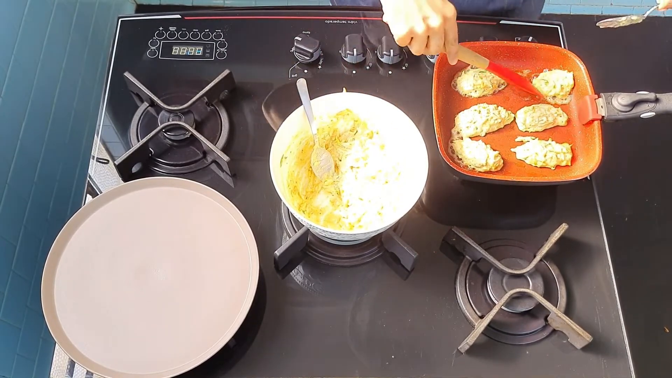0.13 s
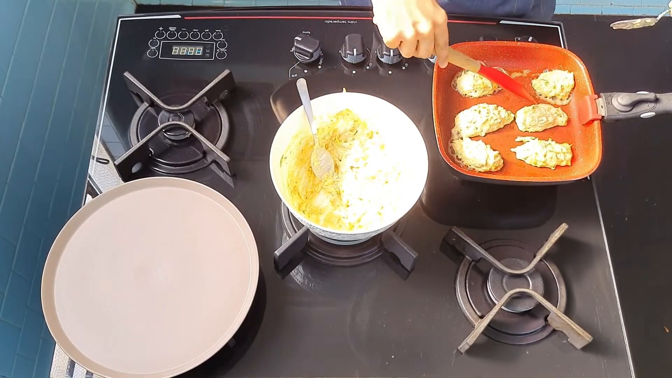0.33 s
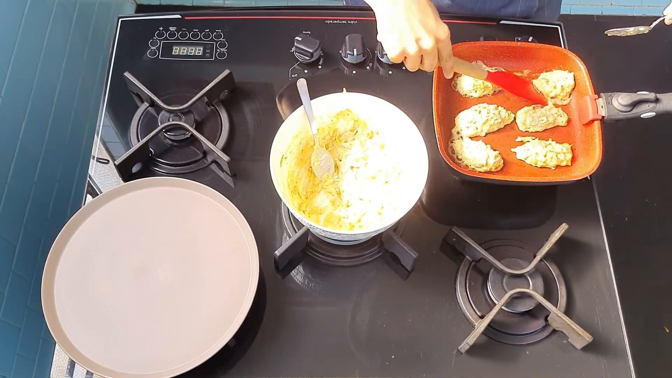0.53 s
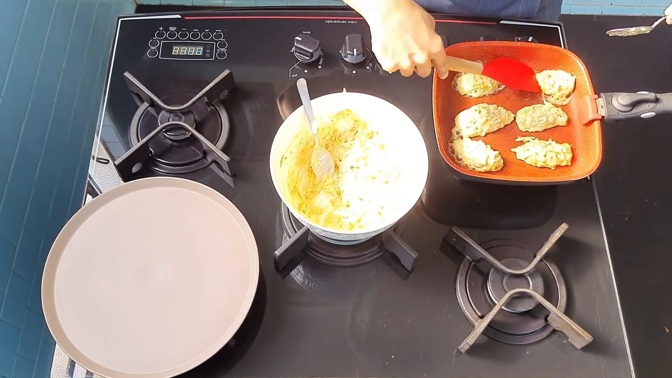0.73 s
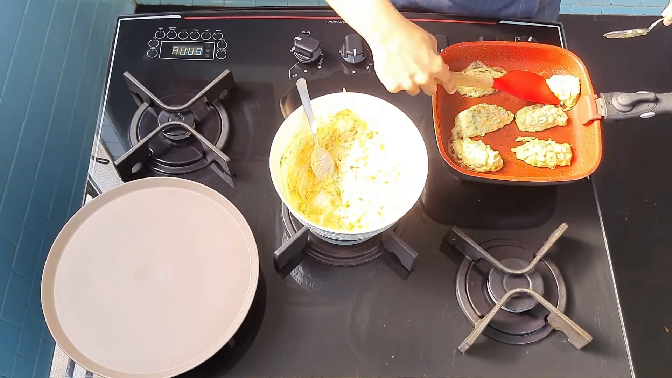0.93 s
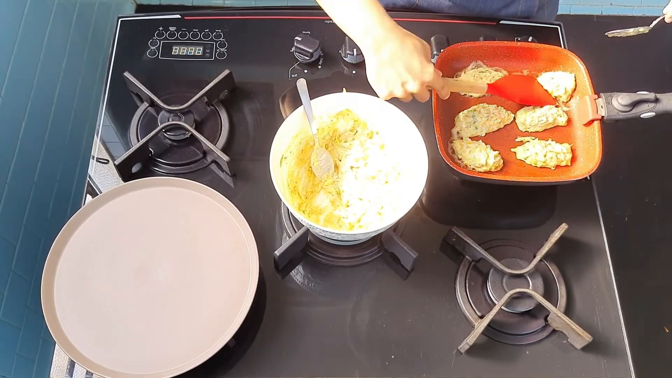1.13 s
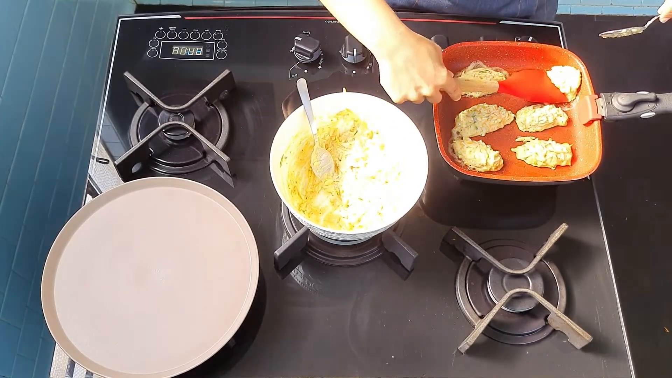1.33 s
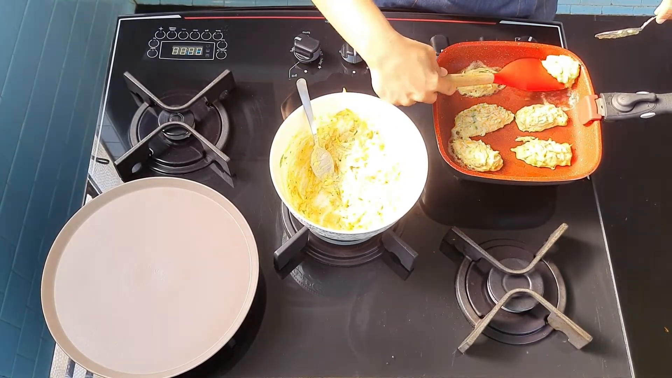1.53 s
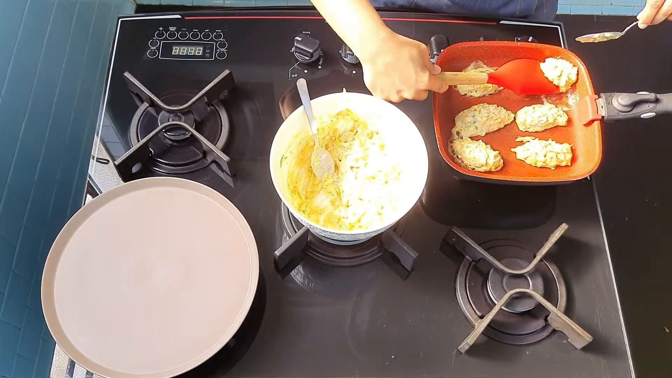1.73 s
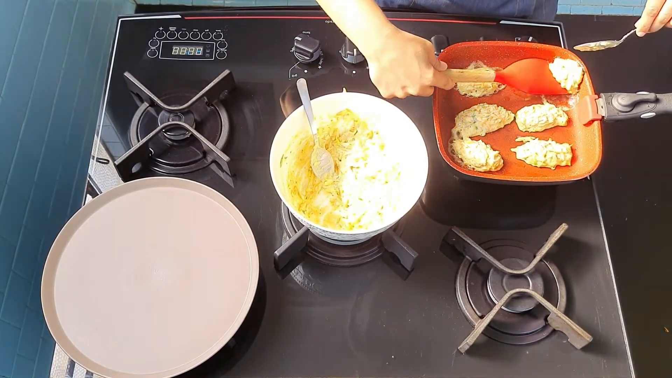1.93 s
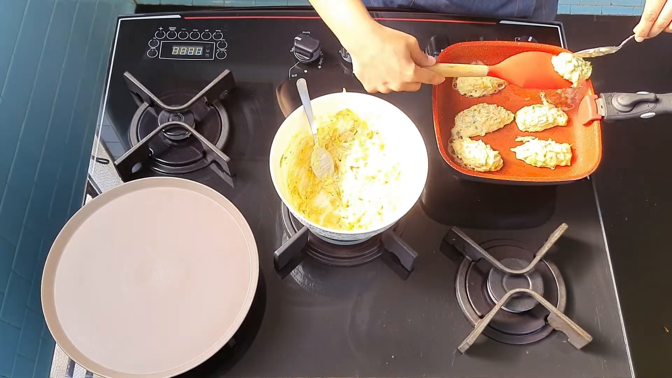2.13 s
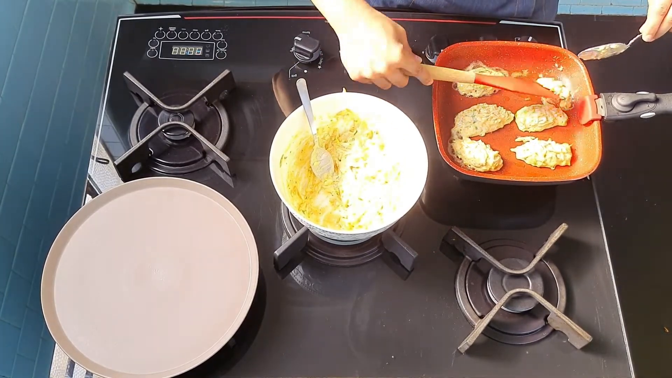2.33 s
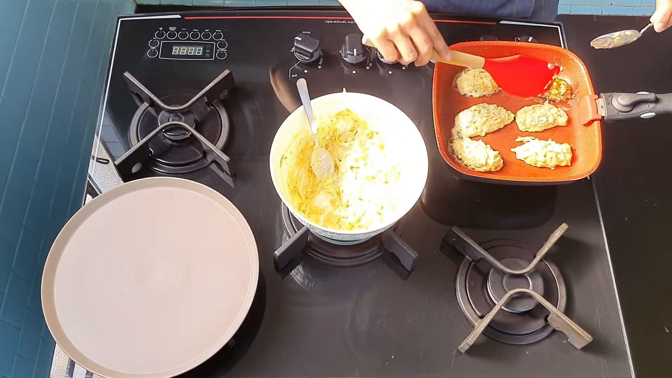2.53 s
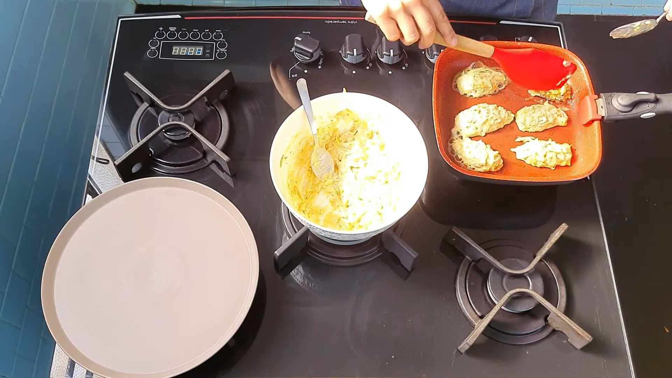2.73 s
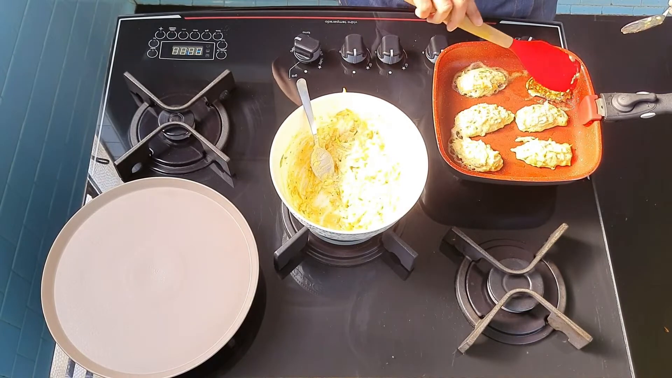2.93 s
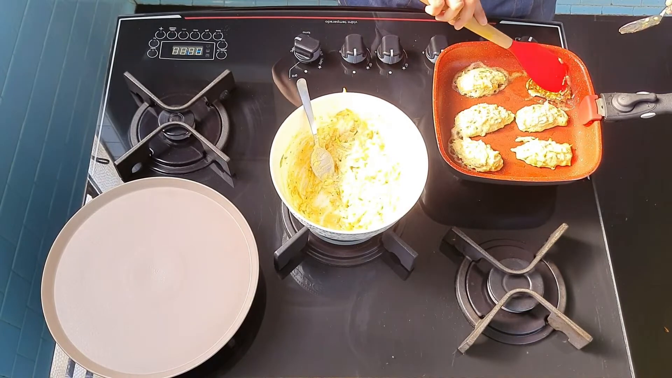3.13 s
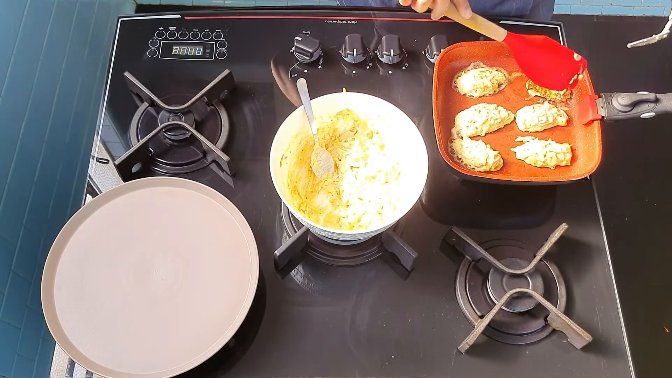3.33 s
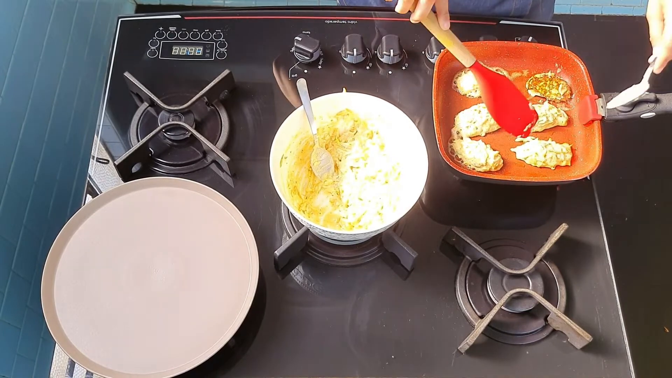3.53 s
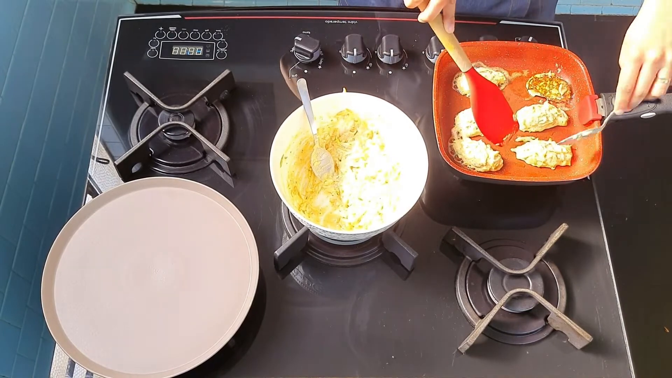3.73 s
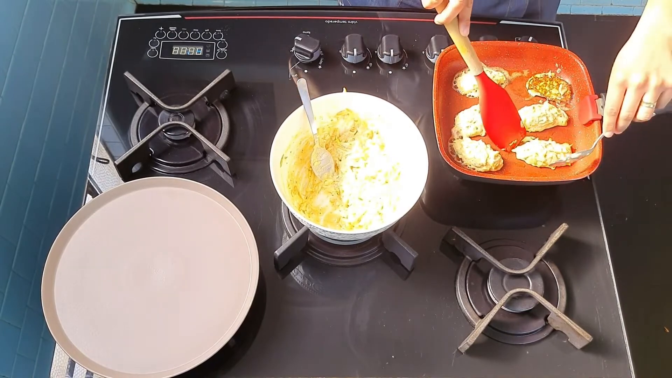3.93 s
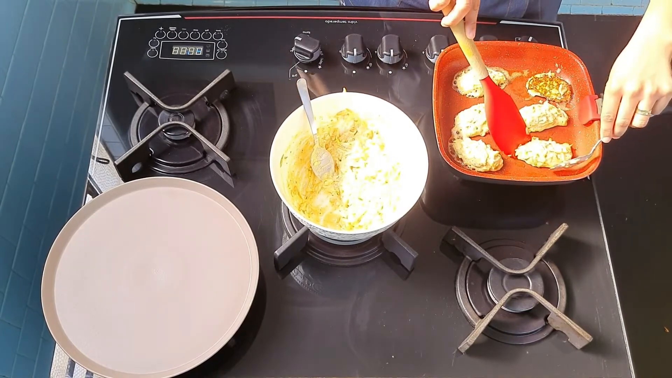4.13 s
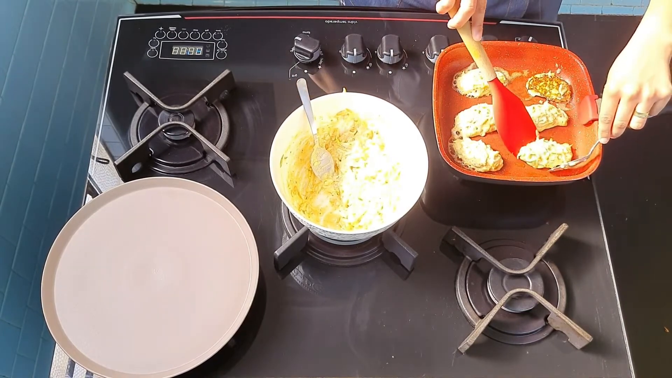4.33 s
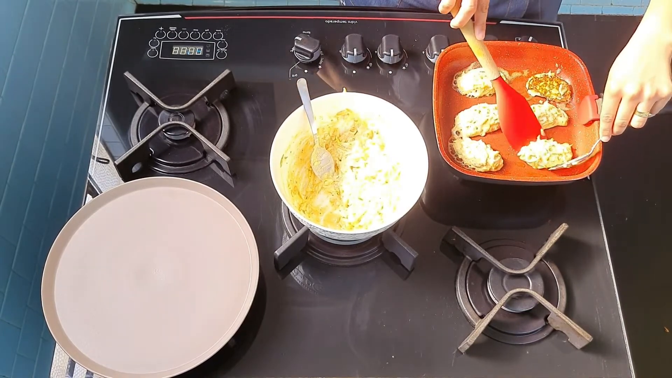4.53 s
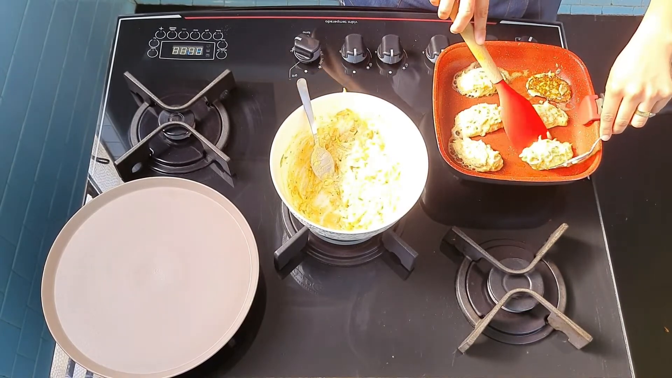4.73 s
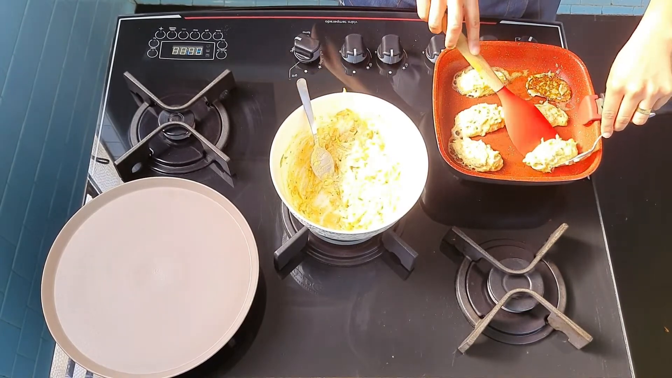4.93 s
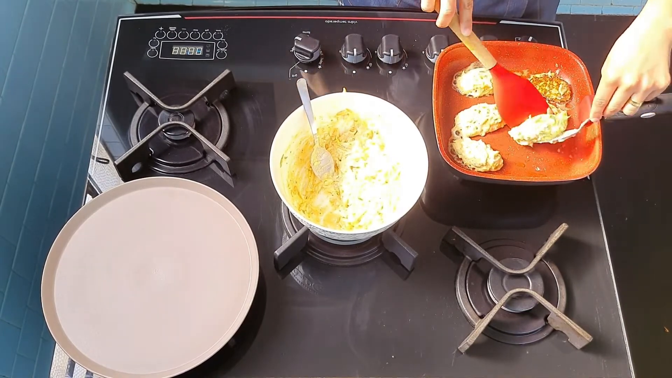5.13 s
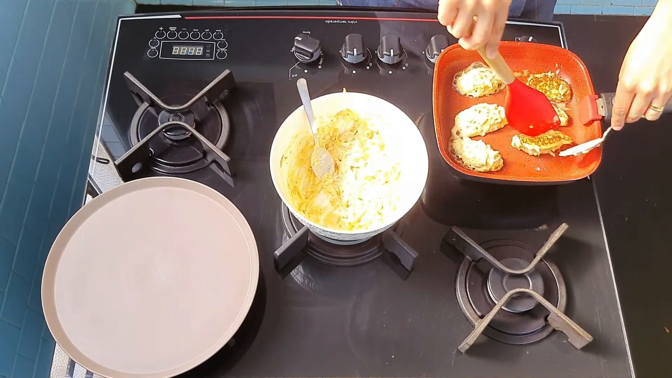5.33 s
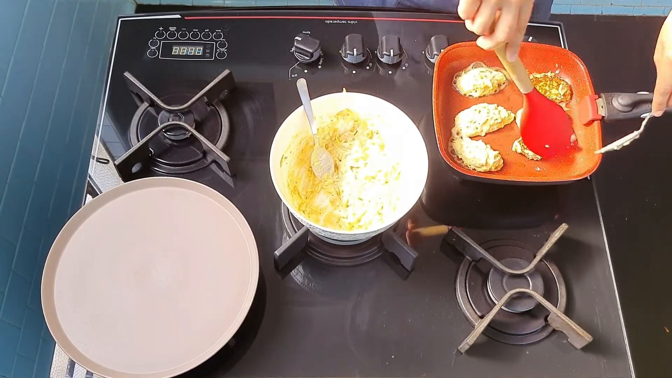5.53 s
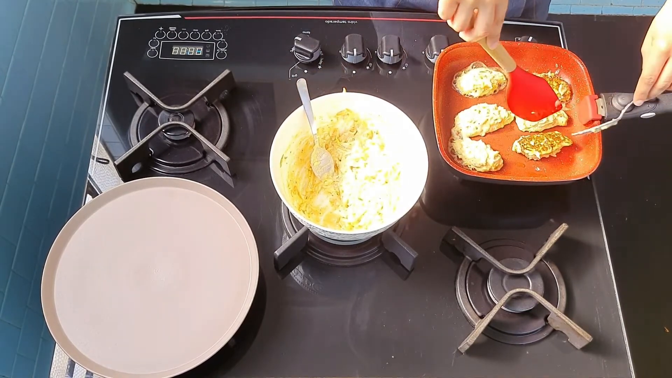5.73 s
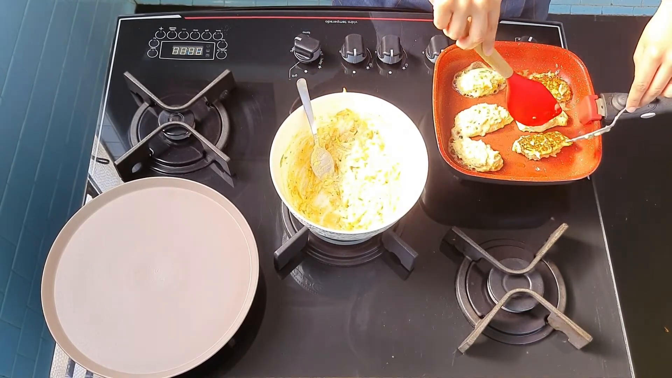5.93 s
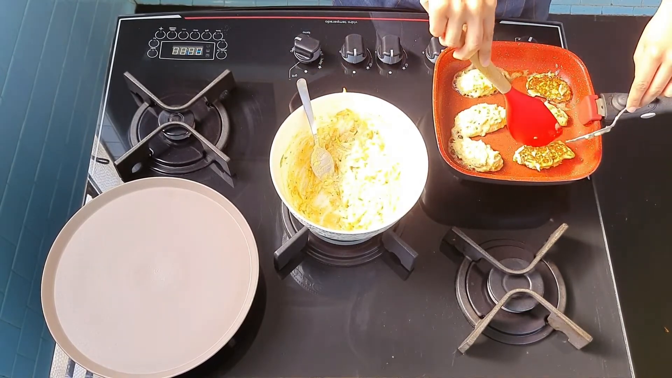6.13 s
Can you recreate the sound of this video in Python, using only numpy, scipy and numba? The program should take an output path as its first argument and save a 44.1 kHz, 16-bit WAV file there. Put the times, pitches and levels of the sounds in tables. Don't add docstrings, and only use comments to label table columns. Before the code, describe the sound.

Close, bright frying in a small kitchen: fritters sizzle softly in shallow oil, then flare with crackles and light spatula taps as one is lifted. The sizzle thins, then bursts up sharply when the wet side lands, spitting hard before easing and building again at the next turn. A faint extractor fan hums and hisses steadily behind. The phone microphone is near the pan, thin in bass and crisp on top.

```python
import sys
import numpy as np
from scipy import signal
from scipy.fft import rfft, irfft
from scipy.io import wavfile
from scipy.ndimage import uniform_filter1d
from numba import njit

SR = 44100
rng = np.random.default_rng(int(sys.argv[2]) if len(sys.argv) > 2 else 0)


def int16_out(signal):
    q = np.round(np.clip(np.atleast_2d(signal).T, -1, 1) * 32767)
    wavfile.write(sys.argv[1], SR, q.astype(np.int16))


def decibels_to_gain(level_db):
    exponent = np.asarray(level_db, float) / 20
    return 10 ** exponent


N = 272538


def level(x, db):
    return x * decibels_to_gain(db) / np.sqrt(np.mean(x ** 2))


def highpass(x, hz):
    return signal.sosfilt(signal.butter(2, hz, "high", fs=SR, output="sos"), x)


def colour(x, points):
    hz, db = np.transpose(points)
    f = np.maximum(np.arange(N // 2 + 1) * SR / N, 1)
    gain_db = np.interp(np.log(f), np.log(hz), db)
    return irfft(rfft(x) * decibels_to_gain(gain_db), N)


def curves(table):
    s, *columns = np.transpose(table)
    return [np.interp(np.arange(N) / SR, s, c) for c in columns]


def walk(rate):
    hold = int(SR / rate)
    steps = np.repeat(rng.standard_normal(N // hold + 1), hold)
    return 1.04 * uniform_filter1d(uniform_filter1d(steps, hold), hold)[:N]


def flares(rate, fade_s):
    u = rng.random((int(rate * N / SR), 2)).T
    starts = np.bincount((u[0] * N).astype(int), 0.26 + u[1], N)
    x = signal.lfilter([1], [1, -np.exp(-1 / (fade_s * SR))], starts)
    x = uniform_filter1d(x, size=40)
    return np.minimum((x - x.mean()) / x.std(), 2.5)


@njit
def grains(s, hz, cycles, size, glide):
    out = np.zeros(N + 2048)
    for k in range(len(s)):
        start = int(s[k] * SR)
        step = hz[k] / cycles[k] / SR
        z, rise = size[k] + 0j, 1.
        p = np.exp(2j * np.pi * hz[k] / SR - 3 * step)
        bend = np.exp(2j * np.pi * hz[k] / SR * glide * step)
        for i in range(min(2048, int(2 / step))):
            rise *= 1 - hz[k] / SR
            out[start + i] += z.imag * (1 - rise)
            z, p = z * p, p * bend
    return out[:N]


# (time [s], pitch of the fourth partial [Hz], swell [dB])
FAN_MOTOR = [
    (0, 705.2, -10),
    (.64, 706, -2.5),
    (1.9, 705.3, .5),
    (3.3, 703.4, 0),
    (4, 704.6, 0),
    (6.18, 705.3, 0),
]
# (multiple of the shaft pitch [1], level [dB rms])
MOTOR_PARTIALS = [(1, -69.5), (2, -63.5), (3, -63), (4, -52.5)]
# (frequency [Hz], density [dB per Hz])
FAN_AIR = [(25, -66), (45, -24.5), (65, -26.5), (130, -22), (200, -18.5), (350, -20.5), (700, -22),
           (1100, -24.5), (2500, -30), (6000, -34), (16000, -47.5)]


def fan():
    fourth_hz, swell_db = curves(FAN_MOTOR)
    turn = 2 * np.pi * np.cumsum(fourth_hz / 4) / SR
    hum = 0
    for k, db in MOTOR_PARTIALS:
        partial_db = db + swell_db + 1.15 * walk(rate=11)
        hum = hum + np.sqrt(2) * decibels_to_gain(partial_db) * np.sin(k * turn + k * k)
    air_s = [0, .15, 2.4, 4.7, 5.2, 6.18]
    air_db = np.interp(np.arange(N) / SR, air_s, [-6.0, -1.0, -1.0, -2.0, 1.5, 0.5])
    air = level(colour(rng.standard_normal(N), FAN_AIR), -49.5)
    return hum + air * decibels_to_gain(air_db + 0.23 * walk(rate=1.03))


def kitchen(x):
    t60_s, tail_db = .15, -21
    t = np.arange(SR // 4) / SR
    tail = rng.standard_normal(len(t)) * 1000. ** (-t / t60_s) * (t > .004)
    response = decibels_to_gain(tail_db) * tail / np.sqrt(np.sum(tail ** 2))
    response[0] = 1
    return signal.fftconvolve(x, response)[:N]


# (frequency [Hz], gain [dB])
MIC_PATH = [(60, -30), (250, -6), (500, -8), (1200, -2.5), (1800, -6), (3800, 0), (6000, -1.5), (9000, 6),
            (12000, 5), (14300, 10), (15800, 4.5)]


def close_microphone(x):
    return colour(x, MIC_PATH)


# (frequency [Hz], width [Hz], level [dB])
PAN_MODES = [(636, 130, 0.5), (827, 150, 5), (978, 27, 4), (1470, 360, 4), (1929, 27, 7), (2105, 47, 1.5),
             (2330, 35, -7), (2773, 65, -1.5), (3150, 150, -9)]


def pan(x):
    return x + sum(decibels_to_gain(db) * signal.lfilter(*signal.iirpeak(hz, hz / width, SR), x) for hz, width, db in PAN_MODES)


def hob_echo(burst):
    echo_ms, echo_db = 3.1, -6.5
    burst = highpass(burst, 1500.)
    return burst + decibels_to_gain(echo_db) * np.roll(burst, int(echo_ms * SR / 1000))


# (time [s], level [dB], pitch [Hz])
SPATULA_TAPS = [
    (.7056, -14, 3300),
    (0.65, -12, 5200),
    (0.76, -17, 2160),
    (1.1112, -23, 3160),
    (3.4, -22, 3100),
]


def taps():
    s, db, hz = np.transpose(SPATULA_TAPS)
    return grains(s, hz, 6.4 + 0 * s, decibels_to_gain(db), 0.)


# (time [s], level [dB], pitch [Hz], deep part [dB])
LARGE_DROPS = [(0.052, -15, 13600, 3), (0.3506, -21, 14000, -3), (0.4393, -10.5, 11200, -17),
               (0.4615, -13, 14300, -6), (0.5038, -15.5, 11300, -14), (0.7062, -17.5, 7700, 8),
               (0.809, -18, 10900, -3), (0.8484, -14, 14000, -1), (0.9217, -7, 12300, -15),
               (1.023, -8, 13800, -2), (1.1114, -15, 11100, 5.5), (1.2734, -17, 10500, 2),
               (1.2964, -16.5, 10500, 0), (1.3964, -18, 11400, 5), (1.47, -11.5, 14400, -3),
               (1.4895, -14, 10500, -6), (1.5798, -11.5, 12300, -10), (1.8002, -17, 14100, -5),
               (2.0943, -22, 12900, 3), (2.5116, -19, 12200, 3.5), (2.6156, -15, 11400, -2),
               (2.728, -17, 11200, -6), (3.0113, -16, 9500, -7), (3.2262, -4.5, 11100, -17),
               (3.2435, -12.5, 7000, -4), (3.3152, -13, 8970, 0.5), (3.3762, -15.5, 6500, -6),
               (3.5154, -18, 5600, -11), (3.7552, -20.5, 12860, 6), (5.6631, -15, 12000, 7)]
# (time [s], level [dB])
SPITS = [(.175, -22), (.191, -27), (.2156, -20), (.275, -26), (.3063, -19), (.496, -18),
         (.5426, -20), (0.563, -16), (0.6128, -8.5), (.6305, -13), (.6552, -15), (1.0013, -9),
         (1.2241, -17), (1.3168, -19), (1.8688, -21), (1.924, -24), (1.9502, -15), (2.021, -16.5),
         (2.144, -24), (2.4295, -23), (2.4415, -21), (2.49, -21), (2.5502, -26),
         (2.664, -4), (2.696, -8), (2.7879, -16), (2.9066, -7), (3.017, -5.5), (3.107, -17),
               (3.1463, -10), (3.2516, -7), (3.682, -15), (3.6985, -14), (3.9013, -21), (3.9728, -26),
               (4.0237, -25), (4.048, -13), (4.2923, -19), (4.4635, -14), (4.5297, -14), (4.5972, -20),
               (4.648, -11.5), (4.7192, -17), (4.7975, -17), (4.8431, -10), (4.8664, -14), (5.282, -19),
               (5.4743, -14), (5.5241, -14), (5.585, -10.5), (5.607, -12), (5.6274, -24), (5.7798, -19)]


def pops(count=18):
    spit_hz, spit_deep_db, spatter_ms, crack_db = 13330, -26, 3.6, 4
    spits = [(s, db, spit_hz, spit_deep_db) for s, db in SPITS]
    drops = LARGE_DROPS + spits
    s, db, hz, deep_db = np.transpose(drops)[:, :, None]
    u = rng.random((len(drops), 3, count)).transpose(1, 0, 2)
    hz = hz * (0.958 + 0.11 * u[0, :, 1:2])
    ms = spatter_ms * (.6 + .8 * u[0, :, 2:3])
    one = np.ones(len(drops))
    crack = grains(s[:, 0], hz[:, 0], 7 * one, decibels_to_gain(db[:, 0] + crack_db), 0.05)
    deep_hz = 4500 + 3200 * u[0, :, 0]
    deep = grains(s[:, 0], deep_hz, 1.58 * one, decibels_to_gain(db + deep_db + 11.5)[:, 0], 0.27)
    late_s = ms / 1000 * (1.8 * u[1] - .5)
    size = decibels_to_gain(db - 5.0 - 10 * u[1]) * np.sqrt(ms / 3)
    pitch = np.minimum(hz * (.5 + 0.84 * u[2]), 15800.).ravel()
    spatter = grains((s + late_s).ravel(), pitch, 7 + 0 * pitch, size.ravel(), 0.034)
    return crack + pan(deep) + spatter


# (frequency [Hz], gain [dB])
LIFTED_COLOUR = [(1700, 0.5), (2500, -5.5), (3050, 1.5), (4100, -4), (5150, -1), (5500, -1.5), (5900, 2),
                 (6600, -3.5), (7350, 1), (8200, -5), (9200, -4.5), (10600, 0.5), (11600, -2),
                 (14000, -3.2)]
# (frequency [Hz], gain [dB])
TURNED_COLOUR = [(1500, 0.5), (1800, 1.5), (2200, -3.5), (2550, -5.5), (3050, 2), (3750, -5), (5100, 5),
                 (6700, 6.5), (7300, 2.5), (9300, 1), (10300, -6), (11500, 2), (12500, -3.5), (14000, -5.7)]
# (time [s], lifted [0-1], turned [0-1])
CORNER_SHARE = [(0, 0, 0.6), (.4, 0.34, 0.33), (.7, 1, 0.08), (1.6, 0.7, 0.2), (2.1, 0.36, 0.16),
                (2.2, 0.09, 0.44), (2.55, 0, 0.36), (2.65, 0.14, 0.7), (3.5, 0, 0.66), (3.95, 0.4, 0.23),
                (4.3, 0, 0.25), (6.18, 0.53, 0.09)]


def corner(x):
    lifted, turned = np.clip(curves(CORNER_SHARE), 0, 1)
    spread = (1 - lifted - turned) * x
    return spread + lifted * colour(x, LIFTED_COLOUR) + turned * colour(x, TURNED_COLOUR)


# (start [s], end [s], pitch [Hz], level [dB])
STEAM_POCKETS = [(0.33, .55, 5700, -4), (0.6, .92, 10700, -11), (.58, 0.78, 7700, 7), (0.46, 1.63, 5220, 7),
                 (1.08, 1.5, 5600, -1), (0.69, 1.13, 4300, 6.5), (1.3, 1.46, 4270, 6), (.85, 1.07, 5900, 3),
                 (1.217, 1.42, 11000, 4.5), (1.37, 1.5, 7100, 6), (1.28, 1.58, 2300, 6),
                 (1.675, 1.86, 3100, 9), (1.4, 2.5, 1400, 8), (1.6, 2.5, 1900, 7), (1.34, 1.54, 2940, 4.5),
                 (2.53, 2.7, 7050, -1), (2.57, 2.82, 3210, 3.5), (2.803, 3.123, 2900, 2),
                 (2.63, 3.4, 820, 6), (3.02, 3.45, 1500, 4), (3.056, 3.6, 7000, 0), (3.2, 3.7, 2200, 1),
                 (3.2, 3.2, 6600, -6), (3.3, 3.8, 4900, 2), (3.4, 3.82, 6300, 1), (3.702, 3.917, 8700, -14),
                 (5.148, 5.55, 4267, -1), (5.3, 6, 870, 2), (5.65, 6.18, 5500, -6)]


def pockets(x):
    sharpness = 24.3
    out = x.copy()
    for start, end, hz, db in STEAM_POCKETS:
        a, b = int(start * SR), min(int(end * SR), N)
        ring = signal.lfilter(*signal.iirpeak(hz, sharpness, SR), x[a:b])
        out[a:b] += decibels_to_gain(db) * np.sqrt(np.hanning(b - a)) * ring
    return out


# (time [s], strength [dB], share of large bubbles [dB])
BOIL_STRENGTH = [(0, -41, -16.5), (.3, -37.5, -20), (.42, -29, -26), (.68, -30, -21), (.71, -29, -11.5),
                 (1.12, -27, -11), (1.17, -34, -10.5), (1.58, -35.5, -4), (1.63, -37.5, -10),
                 (2.14, -35, -15.5), (2.18, -38.5, -23), (2.56, -38, -20.5), (2.63, -25, -23.5),
                 (2.8, -26.5, -10.5), (3.3, -26.5, -15), (3.94, -31.5, -14), (5.35, -29.5, -17.5),
                 (6.18, -26.5, -15)]
# (peak [s], gain [dB], build-up [s], extra large bubbles [dB])
GUSHES = [(.175, -1, .03, -3), (.45, 1, 0.071, -1), (.5, -1, 0.025, 4), (.64, 1, .04, 3),
          (.87, -1, 0.027, 1.5), (.925, 5.5, 0.062, -1.5), (1.025, 5, .06, -3.5), (1.115, 2, 0.035, 3),
          (1.3, 1.5, .05, -1.5), (1.39, 1, 0.074, 4), (1.475, 8.5, 0.075, -1.5), (1.585, 4, 0.012, 0),
          (1.76, 3.5, 0.087, 1), (1.95, 2.5, 0.076, 0.5), (2.43, 2, .04, -3), (2.668, 9.5, 0.02, -9),
          (2.73, 2.5, 0.067, -0.5), (2.905, 6.5, 0.033, -3), (3.025, 4.5, .05, -3), (3.215, 6, .09, -3),
          (3.515, 2, 0.033, 3), (4.05, 3, .03, -1.5), (4.65, 1, .08, 0.5), (4.85, 2.5, 0.3, -0.5),
          (5.41, 4, 0.044, 2), (5.478, 7, 0.054, -4.5), (5.59, 2.5, 0.035, -1), (5.625, 6, .05, -3.5),
          (5.75, 3.5, 0.23, 1), (5.97, 1.5, 0.036, -1)]
# (strength share [1], large-bubble share [1], gush share [1],
# gain on the wet side [dB], offset [dB])
SIZE_FOLLOWS = [
    (1, 0.035, 1, -0.5, 0.5),
    (0.99, 0.44, 0.84, 2, -0.5),
    (0.99, 0.99, 0.62, 0.5, 0.5),
    (0.47, 0.47, 0.36, 7.5, -34.5),
]


def boil():
    turn_s, soak_s = 2.49, 0.22
    t = np.arange(N) / SR
    strength_db, large_db = curves(BOIL_STRENGTH)
    shapes = np.array([np.interp(t, [s - rise, s, s + rise], [0, 1, 0]) for s, _, rise, _ in GUSHES])
    _, gain_db, _, extra_db = np.transpose(GUSHES)
    gush_db = gain_db @ shapes
    large_db = large_db + extra_db @ shapes
    wet = np.clip((t - turn_s) / soak_s, 0, 1)
    return [a * strength_db + b * large_db + c * gush_db + wet_db * wet + db
            for a, b, c, wet_db, db in SIZE_FOLLOWS]


# (lowest [Hz], highest [Hz], ring [cycles], size scatter [dB], swarm flicker [dB], offset [dB])
BUBBLE_SIZES = [
    (9500, 19900, 3, 1.4, 3, -3.5),
    (4480, 10400, 1.55, 0.94, 2.07, -3),
    (2057, 4480, 4.55, 1.5, 1.8, 0.5),
    (305.5, 1854, 4.2, 1.6, -1.1, 4),
]
BURST_RATES = (9000, 6000, 4000, 2500)


def sizzle():
    swarm = 0.31 * flares(rate=45, fade_s=0.0037) + .5 * walk(rate=140)
    out = 0
    for row, rate, boil_db in zip(BUBBLE_SIZES, BURST_RATES, boil()):
        lo_hz, hi_hz, cycles, scatter_db, flicker_db, offset_db = row
        u = rng.random((int(rate * N / SR), 4)).T
        hz = lo_hz * (hi_hz / lo_hz) ** u[1]
        size = decibels_to_gain(scatter_db * np.minimum(-np.log(u[2]), 5)) * np.sign(u[3] - .5)
        fizz = pan(grains(u[0] * N / SR, hz, cycles * (.5 + u[3]), size, 0.13))
        fizz = highpass(fizz, 1.02 * lo_hz)
        flare = decibels_to_gain(flicker_db * (swarm + 0.24 * walk(rate=60)))
        out = out + level(fizz * flare, offset_db) * decibels_to_gain(boil_db)
    return out


def scene():
    frying = pockets(sizzle()) + hob_echo(pops() + taps())
    return (close_microphone(kitchen(corner(frying))) + fan())[None]


def top_cut(x):
    return signal.sosfilt(signal.butter(12, 16370, fs=SR, output="sos"), x)


def record(dry):
    top_hz = 15480
    x = highpass(dry, 45.)
    x = .9 * np.tanh(x / .9)
    x = signal.sosfilt(signal.ellip(12, .3, 60, top_hz, fs=SR, output="sos"), x)
    return top_cut(x)


dry = scene()
out = record(dry)
int16_out(out)
```